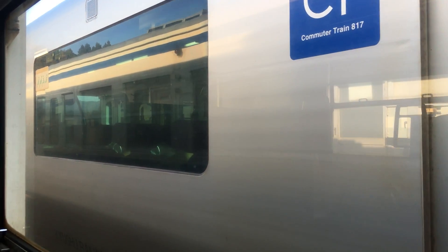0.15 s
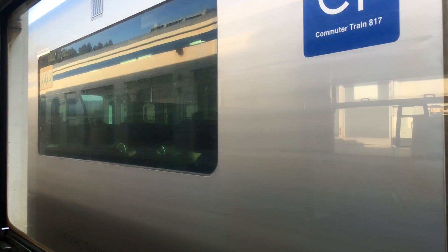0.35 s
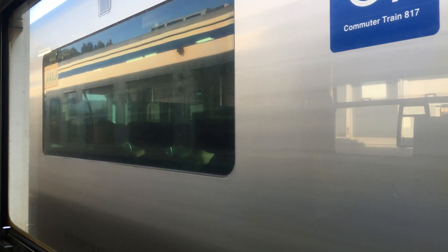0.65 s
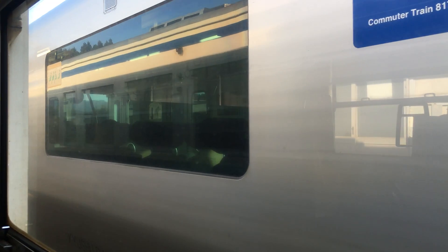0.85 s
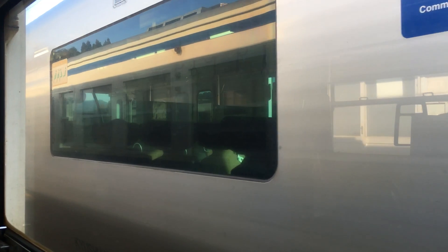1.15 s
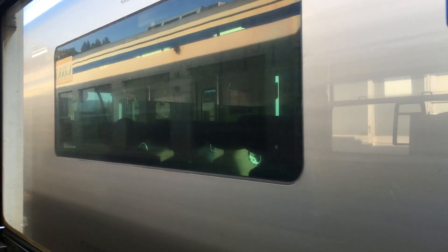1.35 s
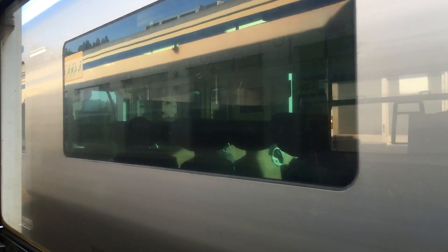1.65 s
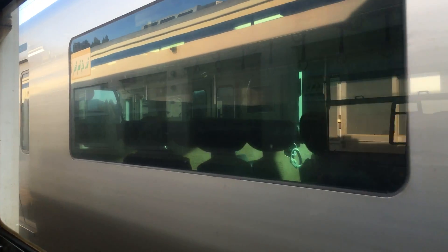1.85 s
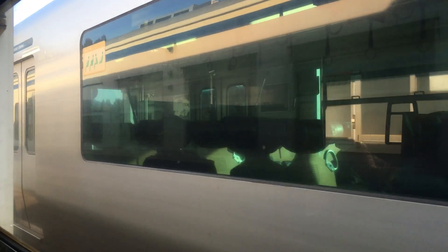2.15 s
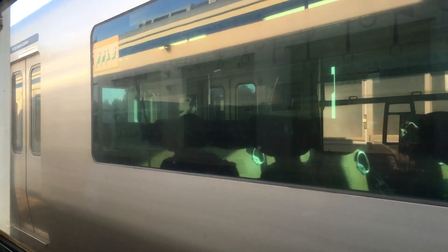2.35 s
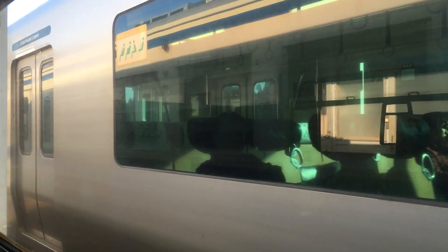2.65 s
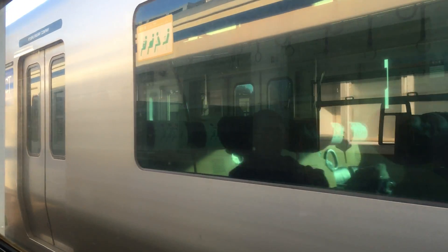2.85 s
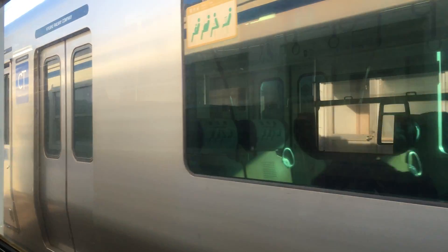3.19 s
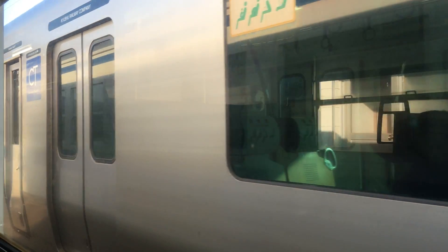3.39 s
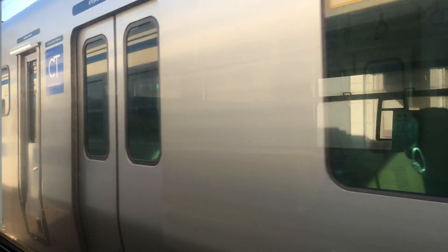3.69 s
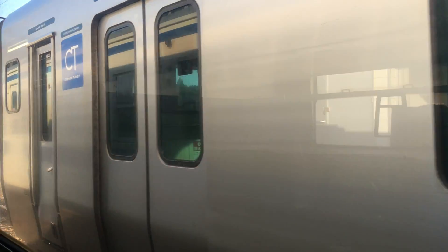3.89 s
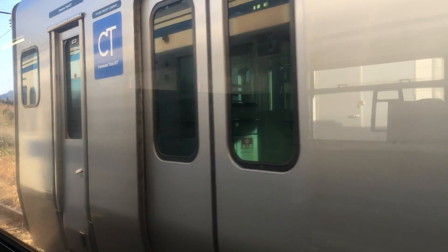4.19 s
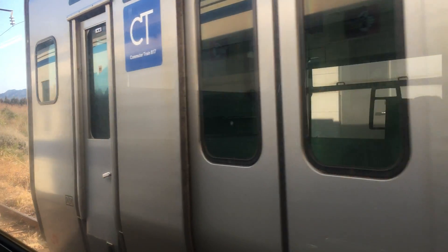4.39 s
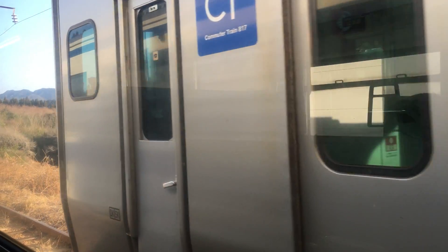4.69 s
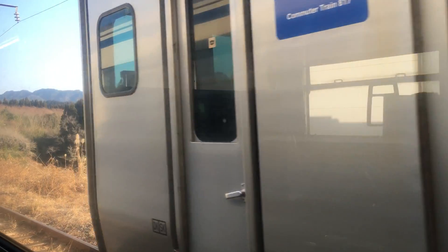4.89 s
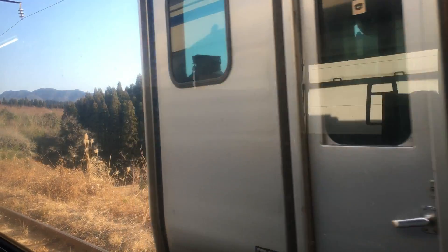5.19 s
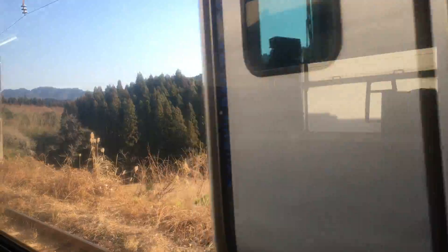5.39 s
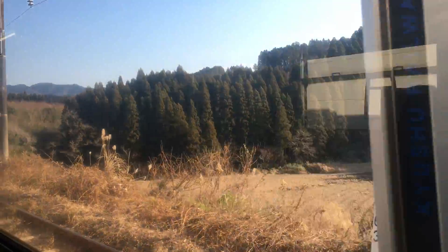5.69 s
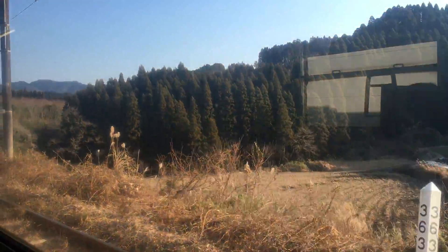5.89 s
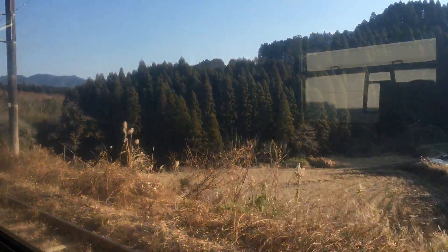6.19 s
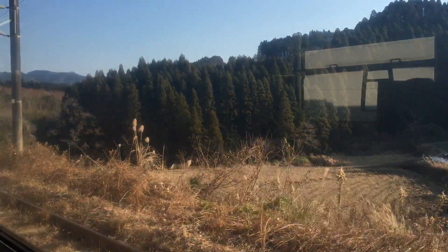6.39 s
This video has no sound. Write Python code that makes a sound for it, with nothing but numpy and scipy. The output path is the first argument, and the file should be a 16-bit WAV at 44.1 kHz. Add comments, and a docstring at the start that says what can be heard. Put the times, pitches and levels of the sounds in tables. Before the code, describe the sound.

A low throbbing diesel hum climbs steadily in a train cabin, joined by faint turbo whistle, short gear whines, track rumble and one rattle.

```python
"""Inside a diesel railcar that pulls away beside a standing train: firing harmonics of a six-cylinder engine
rise from the start with a gear-train hum and a randomly flickering turbocharger whistle, over coloured noise
for track, floor, air and ventilation; its deepest part wanders at random, with brief swells from about 1.6 s.
From about 2.8 s the final drive whines, brief tones tied to road speed. Near 4.9 s a rail joint jolts the car
with bands of rattling and roaring noise; near 5.5 s the second firing harmonic drops as the train's end goes by."""
import sys
import numpy as np
from scipy import signal
from scipy.fft import rfft, irfft, next_fast_len
from scipy.io import wavfile
from scipy.ndimage import uniform_filter1d, map_coordinates

SR = 44100
rng = np.random.default_rng(int(sys.argv[2]) if len(sys.argv) > 2 else 0)


def level_to_linear(level):
    """Convert decibel levels to linear amplitude factors, elementwise."""
    exponent = np.asarray(level, float) / 20
    return 10 ** exponent


def to_wav(sig):
    """Store sig (one row per channel, or 1-D mono) as 16-bit WAV at the path in sys.argv[1].

    Samples outside -1..1 are clipped; the rate is SR.
    """
    pcm = np.clip(np.atleast_2d(sig), -1, 1) * 32767
    pcm = np.round(pcm).astype(np.int16)
    wavfile.write(sys.argv[1], SR, pcm.T)  # frames by channels


N = 288414

CYLINDERS = 6
# Engine speed. Each row: time in seconds, firing rate in Hz.
FIRING_RATE = [(0, 54.6), (.6, 55.9), (1.2, 57.1), (1.55, 58.25), (2, 60.4), (2.4, 62.7), (3, 66.25),
               (3.55, 68.85), (4.1, 70.5), (4.6, 71.3), (5.1, 71.85), (6.54, 73.1)]
# Strong tones, as multiples of the firing rate; the last is the gear-train hum.
STRONG_MULTIPLES = (1, 1.5, 2, 3, 4.96)
# Path through floor and cabin air to the seat. Each row: pitch in Hz, level of a firing tone in dB.
SEAT_PATH = [(54.6, -47), (55.6, -36), (59, -32.5), (60.5, -41), (62.3, -27.5), (64, -33), (66.2, -20),
             (68.3, -15.5), (70, -18), (73, -18.5), (86, -39), (88.6, -35.5), (96.5, -33), (100.5, -50),
             (104, -46), (105.2, -39), (107, -29), (108.2, -20.5), (109.1, -26.5), (109.6, -24.5),
             (110.2, -28.5), (111.3, -22), (113, -20.5), (116, -23), (120, -28.5), (123.5, -44), (130, -32),
             (133, -29), (138.5, -23.5), (141.3, -22), (142.7, -24.5), (144, -23), (164, -45.5),
             (205, -39.5), (208, -48.5), (215, -32), (219, -37.5)]
GEAR_DB = -30.5  # level of the gear-train hum away from its nulls
# Pitches of the hum that the cabin cancels. Each row: centre in Hz, half width in Hz, depth in dB.
GEAR_NULLS = [(273.3, .9, 12), (276.5, 3, 4), (279.6, .9, 14), (284, 4, 3.5), (297, 4, 3), (312, 6, 2),
              (323.5, 2, 18), (339.8, 1.8, 17), (348, 2, 2), (358.5, 4, 7.5)]
# Tones of unequal cylinders. Each row: multiple of the engine-cycle rate, level in dB before cabin and load.
UNEVEN_TONES = [(4, -73), (5, -52), (7, -46), (8, -63), (10, -53), (11, -50.5), (13, -51), (14, -47),
                (15, -45), (16, -46), (17, -48), (20, -47.5), (21, -47), (22, -46), (24, -44.5),
                (25, -51.5), (26, -47.5), (27, -49.5), (33, -61.5), (36, -61)]
# Rougher running under load. Each row: time in seconds, lift of the lowest uneven tones in dB.
LOAD_ROUGHNESS = [(0, -6), (1.7, -0.5), (2.1, 6.5), (2.7, 7.5), (3.1, -0.5), (5, 2), (6.54, -0.5)]
# Booming cabin modes. Each row: centre in Hz, full width in Hz, lift in dB.
CABIN_MODES = [(69.5, 6.8, 11.5), (113.9, 10.3, 17.5), (139.5, 9.8, 14), (206, 13, -1.5)]
# The standing train throws sound back at the window until its end goes by.
CLEAR_S, CLEAR_SOFTNESS_S = 5.55, 0.13
CLEAR_TWICE_DB = -8.5  # change then at twice the firing rate
# Overtones that swell briefly. Each row: multiple of the firing rate, peak in seconds, length in seconds, dB.
OVERTONES = [(8, 4.9, .1, -47), (10, 5.41, .045, -39.5)]
# Turbocharger speed. Each row: time in seconds, whistle pitch in Hz.
TURBO_PITCH = [(0, 3100), (1, 3400), (1.4, 3540), (2.3, 4000), (2.9, 4400), (3.4, 4780), (3.8, 5030),
               (4.1, 5200), (4.65, 5440), (5.3, 5670), (5.7, 5780), (6.54, 5950)]
# Response to the whistle. Each row: pitch in Hz, level in dB.
DUCT_RESPONSE = [(3100, -66), (3300, -62), (3400, -59.5), (3560, -63), (3700, -70), (4000, -67),
                 (4200, -72), (4650, -74), (4760, -66), (5100, -68), (5340, -68), (5440, -61.5),
                 (5560, -66), (5780, -72), (5950, -76)]
STRAND_HZ, STRAND_DB, STRAND_START_S, STRAND_END_S = 5435, -70.5, 4.9, 5.62
# Final-drive speed. Each row: time in seconds, base rate in Hz.
AXLE_RATE = [(0, 9), (2.7, 34.6), (3.3, 45), (3.9, 53.8), (4.4, 65.5), (5.2, 76.5), (6.1, 92), (6.54, 101)]
# Swells as a multiple of that rate crosses a panel resonance.
# Each row: multiple, peak in seconds, length in seconds, level in dB.
WHINES = [(6, 2.796, .12, -40), (6, 3.08, 0.16, -45), (6, 3.88, 0.17, -36), (6, 4.38, .12, -41),
          (3, 5.8, 0.34, -38), (4, 6.2, 0.32, -46), (4, 6.35, 0.14, -42), (9, 2.83, 0.13, -41),
          (9, 5.25, .1, -48)]
# Fittings that shake as the car rocks. Each row: start in seconds, length in seconds, level in dB.
RATTLES = [(4.874, 0.22, -60), (5.22, .08, -65)]
RATTLE_EDGE_S = 0.012
ROAR_START_S, ROAR_END_S, ROAR_EDGE_S, ROAR_DB = 4.76, 5.17, 0.09, -43
# Restless deep rumble from the track, with brief swells at set times.
DEEP_DB, DEEP_SWING_DB, DEEP_SWELL_S = -45.5, 2.5, 0.039
# Each row: peak of a swell in seconds, level in dB.
DEEP_SWELLS = [(1.62, -38), (2.66, -36), (3.66, -36), (4.6, -32), (5.41, -34)]
# Floor rumble. Each row: time in seconds, level in dB.
FLOOR_LEVEL = [(0, -33), (1.3, -39.5), (2.8, -31), (3.4, -38.5), (4.2, -33), (6.54, -32)]
# Spectrum of the floor rumble. Each row: frequency in Hz, relative density in dB per Hz.
RUMBLE_SPECTRUM = [(18, -42), (35, -23), (50, -3.5), (90, -2.5), (160, -3.5), (250, -6.5), (340, -6),
                   (400, -14), (460, -33.5), (600, -64)]
# Air noise. Each row: time in seconds, level of the running noise in dB, level of the hiss in dB.
AIR_LEVELS = [(0, -40, -49), (1.2, -41.5, -48.5), (2.3, -39, -46.5), (3.3, -40, -46.5), (4.1, -40, -46),
              (4.5, -40, -47), (5, -38.5, -45), (5.5, -40.5, -46.5), (6.3, -42, -49), (6.54, -43, -48)]
# Spectrum of the running noise. Each row: frequency in Hz, relative density in dB per Hz.
BODY_SPECTRUM = [(220, -8), (380, -4.5), (415, -6), (510, -7), (591, -6.5), (731, -7), (822, -9),
                 (1020, -6.5), (1100, -8.5), (1220, -9.5), (1750, -15), (2200, -24), (2860, -54),
                 (4840, -120)]
# Spectrum of the hiss. Each row: frequency in Hz, relative density in dB per Hz.
HISS_SPECTRUM = [(1060, -19), (1800, -4), (2200, 1), (2490, -1.5), (2930, -0.5), (3350, -2.5), (3640, -6),
                 (4130, -9), (5560, -17), (7560, -20), (9300, -18), (10500, -25), (12200, -20.5),
                 (14300, -27), (15600, -29)]
# Humming wall panels. Each row: pitch in Hz, relative level in dB, wavers a second.
PANEL_TONES = [(430, -6, 12), (580, 2.5, 14), (628.5, -4, 12), (877, -1, 14), (1031, -0.5, 18),
               (1222, -3.5, 18), (2820, -15, 20)]


def engine(firing_hz):
    """Periodic combustion yields harmonics of the firing rate; unequal cylinders add tones of the whole cycle."""
    return firing_tones(firing_hz) + uneven_tones(firing_hz) + overtones(firing_hz)


def firing_tones(firing_hz):
    """Harmonics of the firing rate and the gear-train hum stay locked to the crankshaft's phase."""
    phase = turns(firing_hz)
    total = np.zeros(N)
    for k, db in zip(STRONG_MULTIPLES, strong_levels(firing_hz)):
        lag = cabin(k * firing_hz)[1]
        total += tone(k * phase + np.pi - lag, db, shake_db=0.5 + 0.2 * k, drift=0.05 * k, rate=20)
    return total


def strong_levels(firing_hz):
    """A gliding tone traces the frequency response of its path, so its level follows its pitch."""
    *firing, gear_hz = [k * firing_hz for k in STRONG_MULTIPLES]
    levels = [by_pitch(SEAT_PATH, hz) for hz in firing]
    levels[2] = levels[2] + CLEAR_TWICE_DB * step(CLEAR_S, CLEAR_SOFTNESS_S)
    gear_loss_db = sum(depth_db / (1 + ((gear_hz - hz) / width_hz) ** 2)
                       for hz, width_hz, depth_db in GEAR_NULLS)
    return levels + [GEAR_DB - gear_loss_db]


def uneven_tones(firing_hz):
    """Unequal cylinders repeat once a cycle; the low tones nearly in step make one cylinder stand out."""
    phase = turns(firing_hz) / CYLINDERS
    load_db = curves(LOAD_ROUGHNESS)[0]
    total = np.zeros(N)
    for k, db in UNEVEN_TONES:
        boom_db, lag = cabin(k * firing_hz / CYLINDERS)
        start = np.pi - lag + 0.11 * k * rng.standard_normal()
        rough_db = load_db / (1 + (k / 15) ** 4)  # the load shows most in the low tones
        level_db = db + boom_db + rough_db
        total += tone(k * phase + start, level_db, shake_db=0.14 * k, drift=0.027 * k, rate=3.016)
    return total


def cabin(hz):
    """Resonant modes lift a tone and turn its phase: returns the lift in dB and the lag in radians."""
    off = [2 * (hz - mode_hz) / width_hz for mode_hz, width_hz, _ in CABIN_MODES]
    lift_db = sum(mode[2] / (1 + u ** 2) for mode, u in zip(CABIN_MODES, off))
    lag = 0.52 * sum(np.arctan(u) for u in off)
    return lift_db, lag


def overtones(firing_hz):
    """High harmonics of the firing rate emerge briefly above the drone."""
    phase = turns(firing_hz)
    return sum(tone(k * phase, db + swell(s, length), shake_db=1.5, drift=0.46, rate=11)
               for k, s, length, db in OVERTONES)


def turbo():
    """A rotor's tone climbs with its speed and flickers; a strand of constant mean pitch joins it for a while."""
    hz = curves(TURBO_PITCH)[0]
    whistle_db = by_pitch(DUCT_RESPONSE, hz) + 2.0 * wobble(7)
    whistle = tone(turns(hz), whistle_db, shake_db=3.5, drift=1.0, rate=70)
    gate = step(STRAND_START_S, 0.04) - step(STRAND_END_S, 0.04)
    strand = tone(turns(np.full(N, STRAND_HZ)), STRAND_DB, shake_db=6, drift=1.0, rate=83)
    return whistle + gate * strand


def final_drive():
    """Gear whines hold fixed ratios to road speed and stand out where they cross a panel resonance."""
    phase = turns(curves(AXLE_RATE)[0])
    return sum(tone(k * phase, db + swell(s, length), shake_db=1.0, drift=0.53, rate=11)
               for k, s, length, db in WHINES)


def jolt():
    """An impulse at a rail joint sets fittings rattling in a bright band and the floor roaring in a dull one."""
    rattle = np.zeros(N)
    for s, length, db in RATTLES:
        gate = step(s, RATTLE_EDGE_S) - step(s + length, 2 * RATTLE_EDGE_S)
        rattle += level_to_linear(db) * gate.clip(0)
    # spectra: (Hz, relative dB per Hz)
    band = rush([(4300, -32), (5200, -2), (6200, 7), (7000, -19), (8600, -6), (10000, -29)], patchy_db=-4)
    roar = rush([(330, -21), (415, 2), (500, -6), (600, 3), (900, -3), (1100, -18), (1400, -30)],
                patchy_db=-1.5)
    heave = level_to_linear(ROAR_DB) * (step(ROAR_START_S, ROAR_EDGE_S) - step(ROAR_END_S, ROAR_EDGE_S))
    return rattle * level_to_linear(2.3 * wobble(40)) * band + heave * roar


def deep_rumble():
    """Narrow-band random vibration from the track: deep noise that wanders at random, with brief set swells."""
    restless = level_to_linear(DEEP_DB + DEEP_SWING_DB * wobble(5.8))
    swells = sum(level_to_linear(db + swell(s, DEEP_SWELL_S)) for s, db in DEEP_SWELLS)
    spectrum = [(20, -11), (33, -4), (40, -19), (50, 12), (58, 5), (75, -40)]  # (Hz, relative dB per Hz)
    return (restless + swells) * rush(spectrum, patchy_db=3.0)


def floor_rumble():
    """Structure-borne random vibration reaches the cabin as low noise through the floor."""
    return level_to_linear(curves(FLOOR_LEVEL)[0]) * rush(RUMBLE_SPECTRUM, patchy_db=2.5)


def air_noise(firing_hz):
    """Broadband running noise and ventilation hiss are slightly amplitude-modulated at the firing rate."""
    body_db, hiss_db = curves(AIR_LEVELS)
    body_db = body_db + 0.4 * wobble(16)
    hiss_db = hiss_db + 0.47 * wobble(22)
    throb = 1 + 0.031 * np.cos(turns(firing_hz))
    body = level_to_linear(body_db) * throb * rush(BODY_SPECTRUM, patchy_db=0.2)
    hiss = level_to_linear(hiss_db) * throb * rush(HISS_SPECTRUM, patchy_db=0.72)
    return body + level_to_linear(body_db - 9.0) * panels() + hiss


def panels():
    """Lightly damped wall panels hum in narrow bands, here sines of wavering size and phase."""
    t = np.arange(N) / SR
    return unit(sum(tone(2 * np.pi * hz * t, db, shake_db=3.0, drift=1.74, rate=rate)
                    for hz, db, rate in PANEL_TONES))


def tone(phase, db, shake_db, drift, rate):
    """A sine of rms level db, with random modulation of level in dB and phase in radians, rate knots a second."""
    level = level_to_linear(db + shake_db * wobble(rate))
    return np.sqrt(2) * level * np.cos(phase + drift * wobble(rate))


def turns(hz):
    """Phase in radians is the running integral of frequency."""
    return 2 * np.pi * np.cumsum(hz) / SR


def rush(spectrum, patchy_db):
    """Filtered white noise of rms 1, with patches of random gain in time and frequency."""
    z = signal.stft(rng.standard_normal(N + 8192), nperseg=512)[2]
    field = uniform_filter1d(rng.standard_normal(z.shape), size=6, axis=0)
    field = uniform_filter1d(field, size=12, axis=1)
    x = signal.istft(z * level_to_linear(patchy_db * unit(field)), nperseg=512)[1]
    m = next_fast_len(len(x))
    hz, db = np.transpose(spectrum)
    log_hz = np.log(np.fft.rfftfreq(m, 1 / SR) + 1)
    gain = level_to_linear(np.interp(log_hz, np.log(hz + 1), db, left=-120, right=-120))
    return unit(irfft(rfft(x, m) * gain, m)[:N])


def wobble(rate):
    """A smooth random curve: a spline through Gaussian knots, rate of them a second."""
    knots = rng.standard_normal(int(N * rate / SR) + 4)
    return map_coordinates(knots, [np.arange(N) * rate / SR])


def step(s, takes_s):
    """A soft transition from 0 to 1 around time s, a hyperbolic tangent."""
    return 0.5 + 0.5 * np.tanh((np.arange(N) / SR - s) / abs(takes_s))


def swell(s, length):
    """A Gaussian envelope is a parabola in dB: 0 at time s, -6.3 one length away."""
    return -6.3 * ((np.arange(N) / SR - s) / length) ** 2


def by_pitch(points, hz):
    """A frequency response in dB, interpolated at pitch hz from (Hz, dB) points."""
    return np.interp(hz, *np.transpose(sorted(points)))


def curves(rows):
    """Linear interpolation to one value per sample for each column after the time."""
    s, *cols = np.transpose(rows)
    return [np.interp(np.arange(N) / SR, s, c) for c in cols]


def unit(x):
    """Normalisation to rms 1."""
    return x / np.sqrt(np.mean(x ** 2) + 1e-20)


def scene():
    """Superposition of all sources at the window seat, in one channel."""
    firing_hz = curves(FIRING_RATE)[0]
    machinery = engine(firing_hz) + turbo() + final_drive()
    running = deep_rumble() + floor_rumble() + air_noise(firing_hz)
    return (machinery + jolt() + running)[None]


def low_pass(x):
    """Removes everything above the highest recorded frequency."""
    return signal.sosfilt(signal.butter(12, 15700, fs=SR, output="sos"), x)


def record(dry):
    """The finished mix, the plain superposition of the sources, is passed on at its own level."""
    return low_pass(dry)


dry = scene()
out = record(dry)
to_wav(out)
```